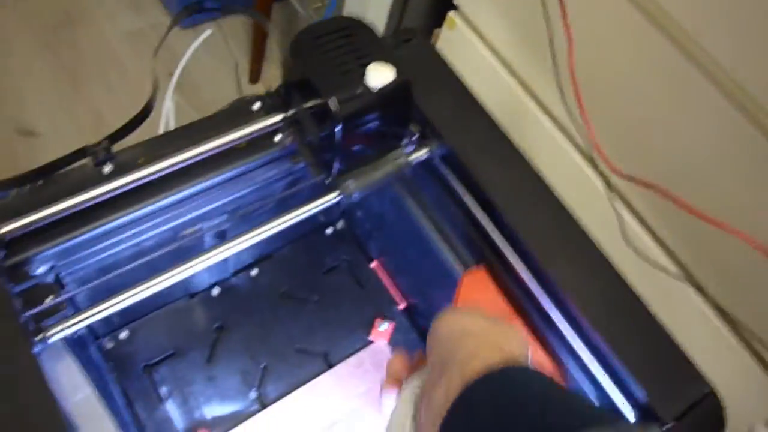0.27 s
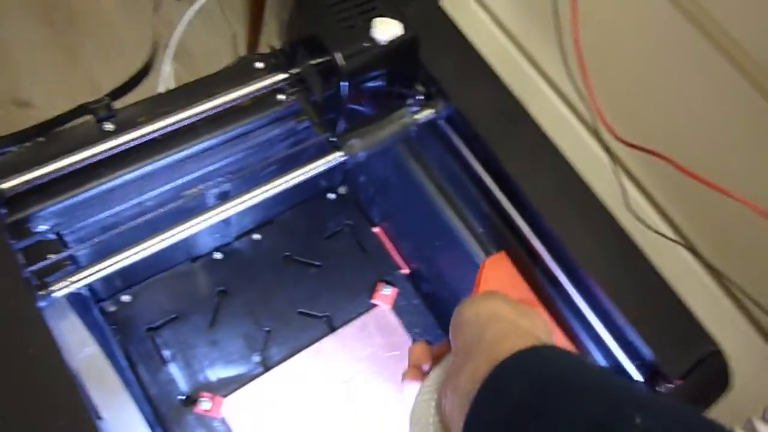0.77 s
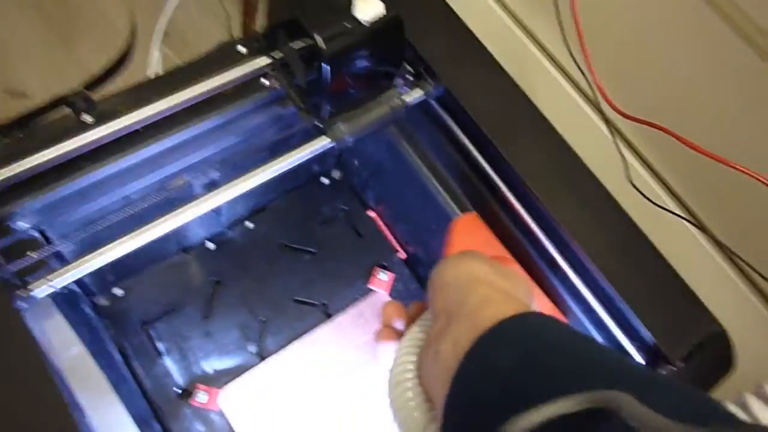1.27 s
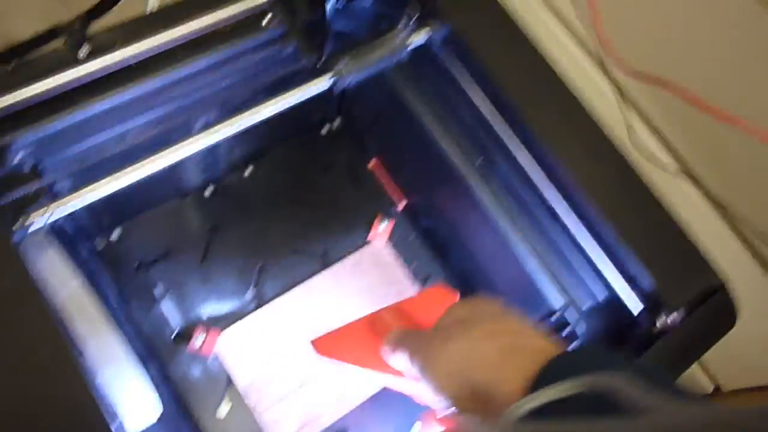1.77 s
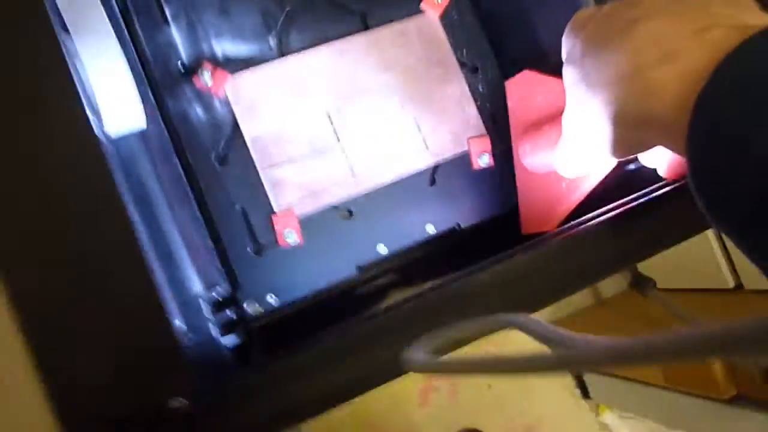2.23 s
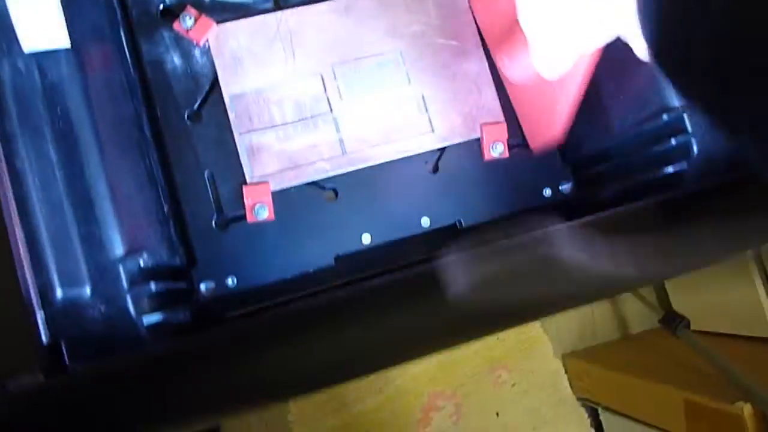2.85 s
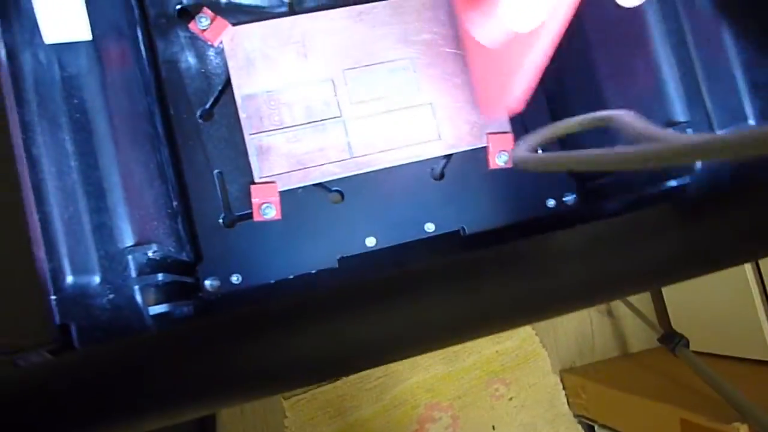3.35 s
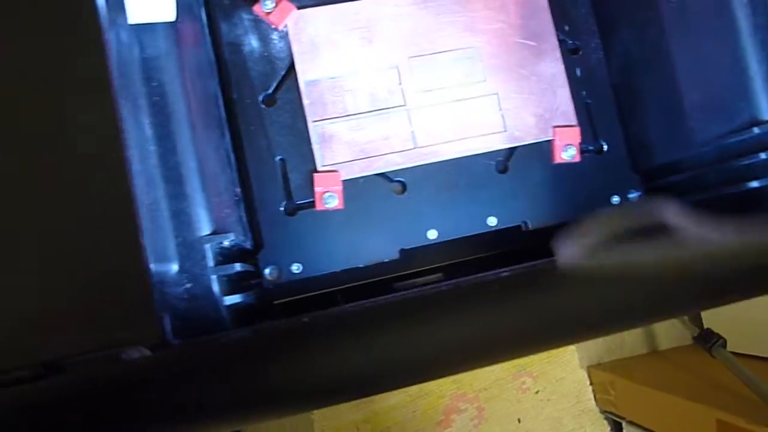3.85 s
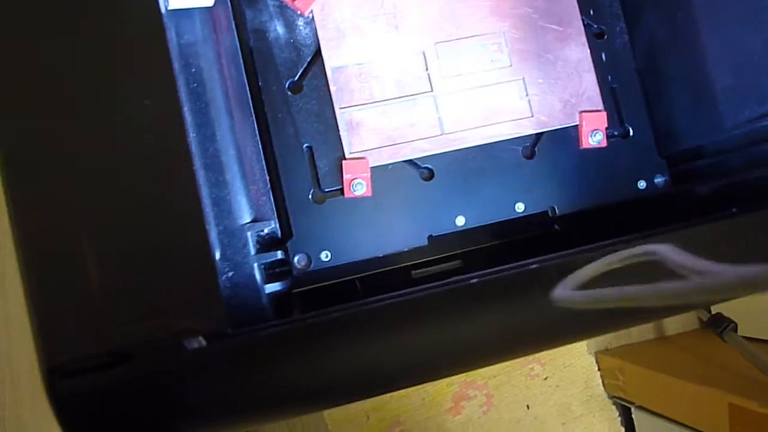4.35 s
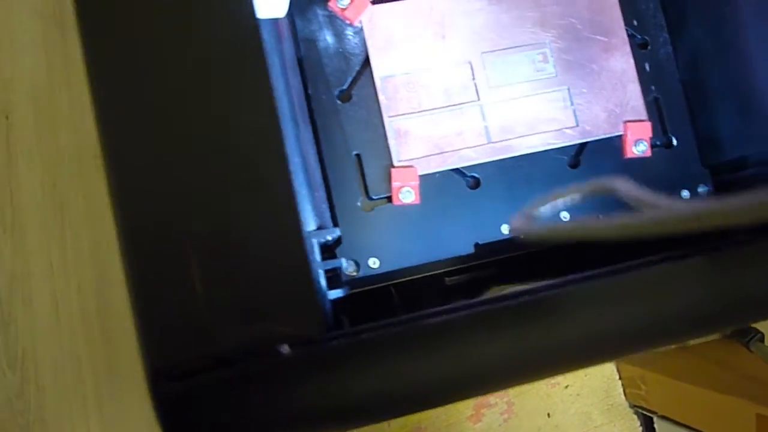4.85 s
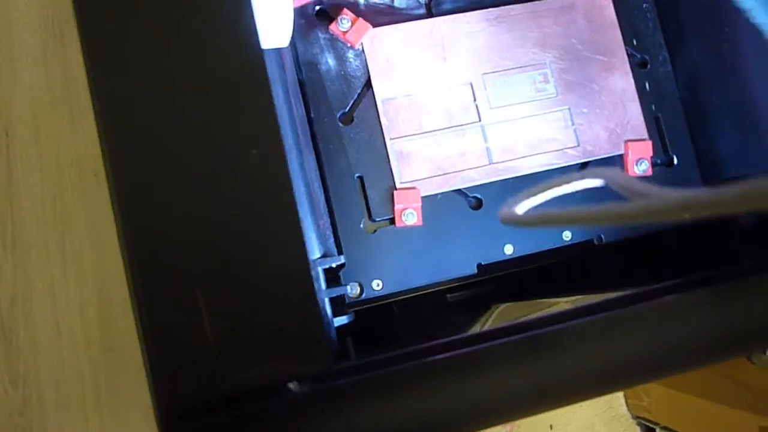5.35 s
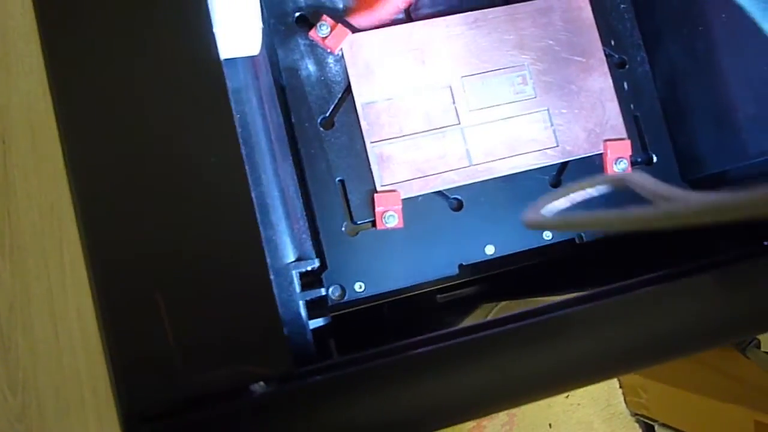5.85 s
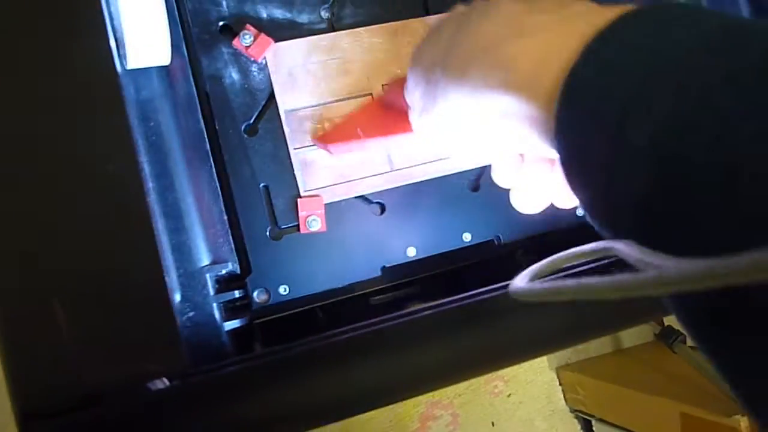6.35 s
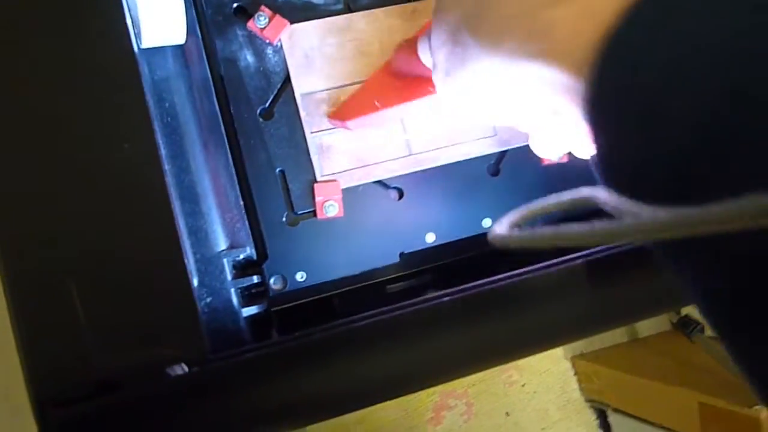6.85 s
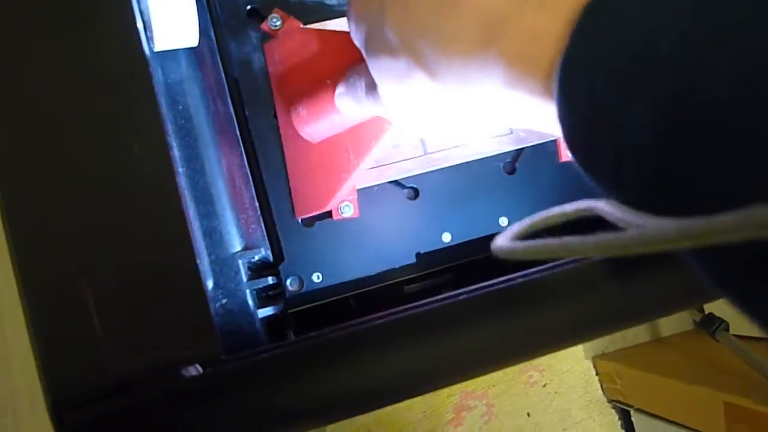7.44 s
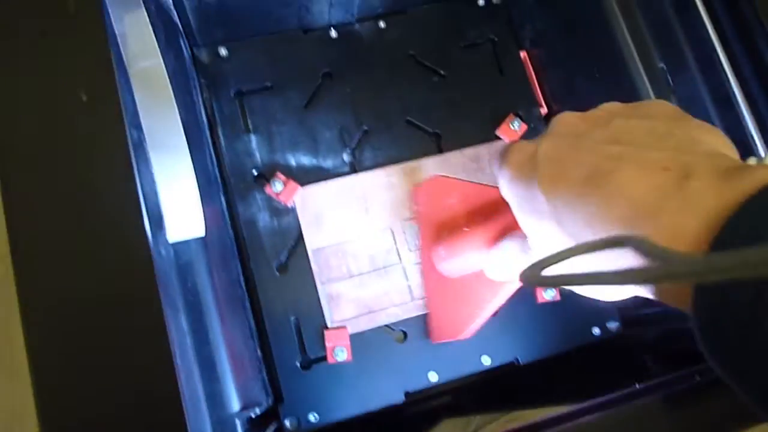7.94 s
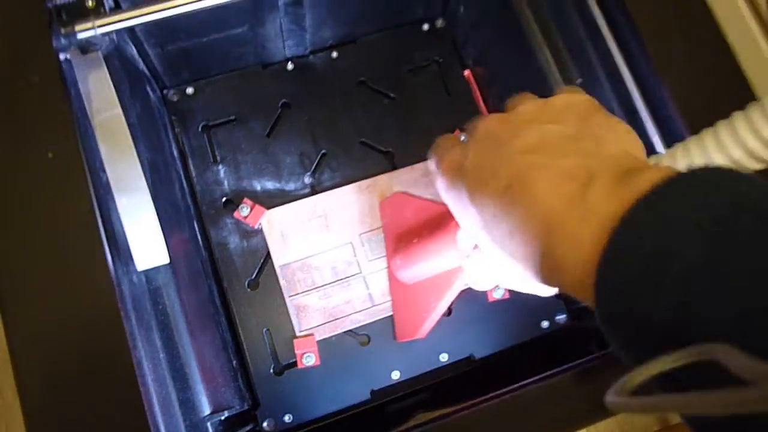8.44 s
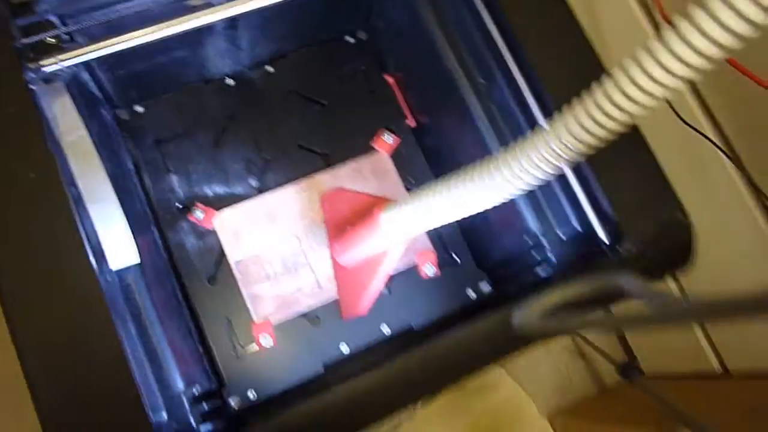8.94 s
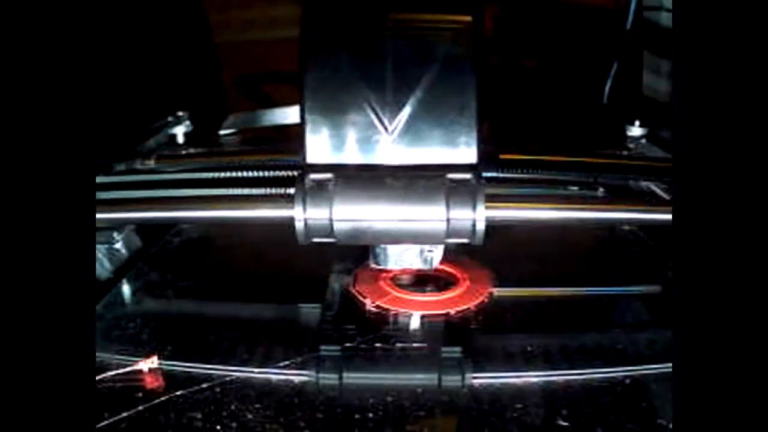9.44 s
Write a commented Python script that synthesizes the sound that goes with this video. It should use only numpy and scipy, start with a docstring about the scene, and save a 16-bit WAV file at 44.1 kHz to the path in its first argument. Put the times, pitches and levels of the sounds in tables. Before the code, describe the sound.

A vacuum cleaner hums and hisses steadily while its nozzle knocks and scrapes inside a machine, then the sound cuts off.

```python
"""A vacuum cleaner's steady hum, hiss and roar, in a workshop. Rotor unbalance gives one clean tone;
turbulence in hose and housing gives the roar; air drawn through the hand-held nozzle hisses and excites
resonances that shift as the nozzle moves. Work on a machine bed adds knocks, scrapes, ticks and bumps.
A small mono microphone with two sharp notches, gain control and a constant offset picks it all up,
until the sound is cut off after nine seconds."""
import sys
import numpy as np
from scipy import signal
from scipy.fft import rfft, irfft, next_fast_len
from scipy.io import wavfile
from scipy.ndimage import uniform_filter1d, map_coordinates

SR = 44100
rng = np.random.default_rng(int(sys.argv[2]) if len(sys.argv) > 2 else 0)


def waveform_to_disk(signal):
    """Save audio, clipped to [-1, 1], as 16-bit WAV at the path in sys.argv[1]."""
    frames = np.transpose(np.atleast_2d(signal))
    scaled = np.clip(frames, -1, 1) * 32767
    samples = np.round(scaled).astype(np.int16)
    wavfile.write(sys.argv[1], SR, samples)


N = 427325


def motor():
    """Forced vibration: the unbalanced rotor shakes the housing once a turn, radiating a pure tone."""
    # rotation rate, sagging as the motor settles: t/s, f/Hz
    shaft = [(0.05, 347.7), (0.6, 347.6), (1.25, 346.4), (1.8, 345.3), (2.7, 344.5), (3.25, 344.9),
             (4.1, 344.3), (6.9, 344.5), (8.5, 344.9)]
    # the motor's hum, swelling and dipping: t/s, level/dB
    hum = [(0.05, -28.5), (0.87, -28), (2.42, -22.5), (2.64, -23), (2.83, -25.5), (2.98, -27.5),
           (3.44, -24.5), (3.88, -26.5), (5.69, -27), (6.76, -25), (6.93, -26), (7.15, -25.5), (7.34, -25),
           (7.51, -25.5), (8.56, -24.5), (8.75, -26)]
    phase = 2 * np.pi * np.cumsum(curves(shaft)[0]) / SR
    return amp(curves(hum)[0] + .4 * wobble(7.7)) * np.sqrt(2) * np.sin(phase)


def nozzle():
    """Jet noise: the turbulent intake hisses and drives four resonances of the nozzle."""
    # lowest resonance: t/s, level/dB, f/Hz
    mouth = [(0.05, -38.5, 1040), (0.22, -41, 1091), (1.29, -40.5, 1118), (1.55, -40.5, 1060),
             (1.65, -40, 1232), (2.13, -35.5, 1174), (2.37, -39, 1060), (3.1, -37.5, 1220),
             (3.25, -37, 1047), (3.37, -37.5, 1228), (3.78, -39, 1035), (4.31, -40.5, 1067),
             (4.61, -39.5, 1180), (5.72, -37, 1184), (5.91, -41, 1143), (7.32, -40.5, 1196),
             (7.93, -39, 1228), (8.75, -39, 1144)]
    # air gap under the nozzle: t/s, level/dB
    gap = [(0.05, -44.5), (1.55, -41.5), (2.01, -47.5), (2.2, -42), (2.4, -40.5), (3.03, -37),
           (3.54, -44.5), (4.29, -43.5), (4.65, -40), (5.21, -37), (5.52, -36.5), (6.06, -41.5),
           (6.45, -40), (7.27, -43.5), (7.46, -38), (7.75, -43.5), (8.46, -45), (8.75, -41)]
    # resonance across the slot: t/s, level/dB
    slot = [(0.05, -40), (0.99, -39.5), (1.4, -40.5), (1.65, -41.5), (1.82, -35.5), (2.28, -39),
            (2.64, -32), (3.03, -37), (3.68, -36), (3.85, -40), (4.36, -36), (4.8, -39.5), (5.48, -36),
            (6.42, -40), (6.64, -38), (7.15, -39.5), (7.88, -39.5), (8.75, -40.5)]
    # air over the edge: t/s, level/dB
    edge = [(0.05, -35.5), (0.51, -35), (2.86, -33.5), (2.88, -40), (2.96, -29.5), (3.27, -39),
            (3.56, -29.5), (3.61, -35), (4.7, -34.5), (4.73, -37), (7.0, -35), (7.03, -35.5), (7.34, -33.5),
            (8.75, -37)]
    # hiss of the jet: t/s, level/dB, brightest f/Hz
    hiss = [(0.05, -27, 5760), (0.44, -25.5, 5950), (0.51, -30, 5620), (0.66, -27, 5980),
            (1.38, -25.5, 5550), (1.57, -25, 6040), (1.67, -31, 5850), (1.92, -27, 6040), (2.06, -31, 5880),
            (2.11, -25.5, 5940), (3.44, -28.5, 5540), (3.51, -25, 5800), (3.66, -29, 6070),
            (3.83, -26, 5970), (4.07, -29, 5960), (4.29, -27, 6060), (5.4, -27, 5610), (6.04, -29, 6150),
            (6.35, -26, 5520), (6.42, -25, 5960), (6.62, -29, 5680), (6.95, -26, 5860), (7.03, -29, 6020),
            (8.05, -26.5, 5800), (8.56, -27, 5830), (8.75, -27, 5880)]
    # spectrum of the hiss: f/Hz, relative level/dB
    hiss_colour = [(2500, -50), (4300, -21), (5000, -4.5), (5600, -1.5), (6200, -2.5), (6700, -4.5),
                   (7000, -12), (7300, -23.5), (7600, -38.5)]

    def hiss_shape(hz, t):
        return amp(along(hiss_colour, hz)) * (1 + peak(hz, curves(hiss, t)[1], 400))

    bands = resonance(mouth, centre_hz=curves(mouth)[1], width_hz=596, patchy_db=1.7, flutter_db=0.4)
    bands += resonance(gap, centre_hz=1698, width_hz=880, patchy_db=2.0, flutter_db=0.25)
    bands += resonance(slot, centre_hz=2415, width_hz=1130, patchy_db=0.53, flutter_db=0.0)
    bands += resonance(edge, centre_hz=3644, width_hz=1650, patchy_db=1.5, flutter_db=0.2)
    return bands + amp(curves(hiss)[0] + 0.87 * wobble(9)) * turbulence(hiss_shape, patchy_db=1.55)


def resonance(levels, centre_hz, width_hz, patchy_db, flutter_db, wander=0.025):
    """A noise-driven resonance passes one band, whose centre wanders with the unsteady hand."""
    centre = centre_hz * (1 + wander * wobble(3.097))

    def shape(hz, t):
        sample = np.minimum(t * SR, N - 1).astype(int)
        return peak(hz, centre[sample], width_hz) ** 3  # cubing narrows the band and steepens its sides

    return amp(curves(levels)[0] + flutter_db * wobble(6)) * turbulence(shape, patchy_db)


def roar():
    """Turbulent flow through hose and housing radiates broadband noise that surges unevenly."""
    # flow noise: t/s, roar level/dB, rumble level/dB
    flow = [(0.05, -44.5, -52.5), (0.39, -38.5, -59), (0.53, -41, -49), (1.55, -43.5, -49.5),
            (1.84, -42.5, -48), (2.64, -36.5, -45.5), (2.98, -40, -53), (3.35, -40.5, -49),
            (3.61, -40, -52), (4.48, -38.5, -49), (4.8, -43, -52.5), (7.39, -41.5, -49), (7.75, -41, -47.5),
            (8.75, -42, -48.5)]
    # spectrum of the roar: f/Hz, relative level/dB
    roar_colour = [(220, -36), (370, 1), (378, -12.5), (452, 0), (508, -7), (556, -7.5), (830, -7.5),
                   (1400, -17), (1820, -34), (3080, -120)]
    # spectrum of the rumble: f/Hz, relative level/dB
    rumble_colour = [(15, -27), (60, -27), (100, -8), (140, -9.5), (180, 4), (240, -1), (330, -9),
                     (400, -3.5), (500, -52.5), (800, -120)]
    roar_db, rumble_db = curves(flow)
    body = turbulence(lambda hz, t: amp(along(roar_colour, hz)), patchy_db=0.5)
    rumble = turbulence(lambda hz, t: amp(along(rumble_colour, hz)), patchy_db=0.5)
    return amp(roar_db + 1.2 * wobble(6)) * body + amp(rumble_db + 0.89 * wobble(6)) * rumble


def standing_waves(air, ripple_db, gain_db):
    """Interference of reflected waves lifts some narrow bands of the air noise and weakens others."""
    # modes of the hose and the machine's open box: f/Hz, width/Hz, gain/dB
    modes = [(448, 60, 2.5), (544, 50, 4), (738, 28, 8), (835, 32, 8), (955, 21, 10.5), (1137, 12, 4),
             (1292, 100, 5), (1408, 20, 9), (1516, 47, 6.5), (1570, 50, 1), (1647, 29, 4.5), (1757, 22, 7),
             (1940, 55, 5.5), (2078, 81, 7.5), (2210, 67, 2), (2150, 75, -4), (2268, 20, 7), (2505, 95, 2),
             (2702, 48, 7), (2770, 70, 3), (3430, 180, 1.5), (3773, 160, 2), (4076, 180, 4), (4715, 190, 5),
             (5450, 130, 2), (5810, 200, -2), (6350, 150, 4)]
    # bands that stand out or drop while the nozzle rests: start t/s, end t/s, f/Hz, width/Hz, gain/dB
    whistles = [(0, 0.48, 470, 78, 6.5), (0, 1.57, 5200, 250, 3), (0, 1.6, 990, 80, 4.5),
                (0, 1.6, 1150, 120, 5.5), (1.7, 2.05, 5900, 230, 9.5), (2.2, 3.25, 2400, 80, 4.5),
                (2.2, 4.5, 1600, 80, 4), (3.4, 3.6, 6200, 700, 4), (3.5, 4.5, 2000, 300, -4.5),
                (7, 9.1, 2340, 90, 6), (7.5, 8.7, 2770, 100, 3), (7.65, 9.1, 1290, 60, 5),
                (7.7, 8.4, 1640, 90, 5), (7.7, 9.1, 1460, 140, -8), (7.7, 9.1, 5750, 201, 4.5),
                (4.6, 5.25, 5900, 700, 3), (6.15, 7, 5570, 250, 4), (5.88, 6.15, 2740, 130, 9),
                (6.6, 6.8, 2320, 100, 8), (8.4, 9.1, 1660, 140, 12), (3.38, 3.85, 2460, 170, 9)]
    hz, t, spectrum = signal.stft(air, SR, nperseg=2048, noverlap=1536)
    db = sum(lift * peak(hz, centre, width) ** 2 for centre, width, lift in modes)[:, None]
    for start, end, centre, width, lift in whistles:
        held = np.clip(np.minimum(t - start, end - t) / 0.061 + .5, 0, 1)
        db = db + lift * peak(hz[:, None], centre, width) ** 2 * held
    # room echoes leave a fine ripple that drifts as hand and microphone move
    ripple = ripple_db * patches(spectrum.shape, bins=2, frames=32)
    return signal.istft(spectrum * amp(db + ripple + gain_db), SR, nperseg=2048, noverlap=1536)[1][:N]


def knocks():
    """Impact on hollow plastic: a click and two heavily damped partials."""
    # the nozzle taps the bed: t/s, level/dB, f/Hz
    impacts = [(2.775, -24, 1320), (2.821, -16.5, 1860), (4.247, -21, 1000), (4.27, -12, 1060),
               (4.417, -20, 992), (4.787, -22, 1190), (5.264, -18.5, 1130), (5.876, -21, 1020),
               (6.258, -22.5, 1610), (6.439, -22, 835), (6.488, -22.5, 760), (6.852, -24, 1230),
               (7.284, -26, 1350)]
    out, t = np.zeros(N), np.arange(SR // 10) / SR
    envelope = t / .0018 * np.exp(1 - t / .0018)  # a few cycles only
    for start, db, hz in impacts:
        ring = np.sin(2 * np.pi * hz * t) + 0.2 * np.sin(2 * np.pi * 1.6 * hz * t)
        click = 0.35 * amp(-60 * t / .006) * rng.standard_normal(len(t))
        out[round(start * SR):][:len(t)] += amp(db) * (0.73 * ring * envelope + click)
    return out


def scrapes_and_ticks(grain_db=3):
    """Random modulation spreads a gliding pitch into a rough noise band; the briefest bursts tick."""
    # short rough scrapes and two high ticks: t/s, duration/s, start f/Hz, end f/Hz, width/Hz, level/dB
    bursts = [(2.813, 0.049, 1950, 1650, 300, -25.5), (2.854, 0.028, 1610, 1200, 200, -23.5),
              (2.914, 0.065, 1900, 1500, 807, -27), (2.965, 0.073, 1910, 2510, 705, -29.5),
              (3.035, 0.074, 1406, 1246, 300, -31.5), (3.095, 0.11, 2010, 1700, 590, -28.5),
              (5.434, 0.074, 2044, 2094, 100, -36), (6.21, 0.034, 1630, 1570, 152, -34),
              (6.356, 0.065, 1750, 1693, 148.5, -33), (6.95, 0.077, 1253, 1350, 1393, -24),
              (6.934, 0.08, 5240, 5160, 2505, -26), (7.493, 0.074, 1193, 1310, 900, -30),
              (1.589, 0.071, 1910, 1880, 590, -35), (7.367, .04, 1194, 1210, 910, -35),
              (7.59, 0.054, 3600, 3400, 909, -31), (0.713, .04, 1100, 1100, 500, -30),
              (0.895, 0.037, 1103, 1100, 500, -33), (6.251, 0.048, 900, 904, 500, -33.5),
              (7.58, 0.048, 798, 750, 300, -33.5), (7.53, 0.0085, 5900, 5900, 1200, -21.5),
              (7.629, 0.017, 5750, 5700, 900, -23)]
    out = np.zeros(N)
    for start, duration, start_hz, end_hz, width_hz, db in bursts:
        progress = np.linspace(0, 1, round(duration * SR))
        knots = np.arange(len(progress)) * width_hz / SR
        in_phase, quadrature = (map_coordinates(row, [knots]) for row in rng.standard_normal((2, 200)))
        phase = 2 * np.pi * np.cumsum(start_hz + (end_hz - start_hz) * progress) / SR
        band = unit(in_phase * np.cos(phase) + quadrature * np.sin(phase))
        out[round(start * SR):][:len(band)] += amp(db) * np.sin(np.pi * progress) ** 0.59 * band
    return out * amp(grain_db * wobble(120))


def bumps():
    """Free vibration: each soft blow thuds and leaves the frame's low modes ringing in a new balance."""
    # hose and hand bump the frame: t/s, level/dB
    blows = [(2.777, -36.5), (2.825, -33.5), (3.475, -43.5), (4.232, -36), (4.421, -38), (4.558, -36.5),
             (4.81, -37.5), (5.16, -33), (5.396, -35.5), (5.926, -36), (6.871, -34.5), (7.391, -35),
             (7.529, -31.5), (8, -46)]
    # modes of the frame: f/Hz, relative level/dB, T60/s
    modes = [(185, -8.5, 0.34), (271.3, -2, 0.44), (434, 2, 0.14)]
    out, t = np.zeros(N), np.arange(SR // 2) / SR
    dull = signal.butter(2, [130, 520], "bandpass", fs=SR, output="sos")
    attack = 1 - np.exp(-t / 0.0036)
    for start, db in blows:
        ring = sum(amp(level + rng.normal(0, 2.0) - 60 * t / t60) * np.sin(2 * np.pi * hz * t)
                   for hz, level, t60 in modes)
        thud = .6 * amp(-60 * t / 0.2) * unit(signal.sosfilt(dull, rng.standard_normal(len(t))))
        out[round(start * SR):][:len(t)] += amp(db) * (ring + thud) * attack
    return out


def gain_control(x, threshold_db=-24, share_removed=0.7, sense_s=0.023, recover_db_per_s=22):
    """Compression: loud moments pull the gain down quickly; it climbs back at a steady rate."""
    sensed = signal.lfilter(*signal.butter(1, 505, "highpass", fs=SR), x[0])  # bass counts for less
    power = np.abs(uniform_filter1d(sensed ** 2, round(sense_s * SR)))
    level_db = 10 * np.log10(power + 1e-12)
    climb_db = recover_db_per_s * np.arange(N) / SR
    held_db = np.maximum.accumulate(level_db + climb_db) - climb_db
    excess_db = uniform_filter1d(np.maximum(held_db - threshold_db, 0), size=200)
    return x * amp(-share_removed * excess_db)


def turbulence(shape, patchy_db):
    """Random pressure of rms 1: shape(hz, t) colours it, patches of random gain make it uneven."""
    hz, t, spectrum = signal.stft(rng.standard_normal(N), SR, nperseg=1024)
    uneven = amp(patchy_db * patches(spectrum.shape, bins=5, frames=6))
    gain = shape(hz[:, None], t) * np.ones(spectrum.shape)
    gain = gain / np.sqrt(np.mean(gain ** 2, axis=0))  # equal power in every frame
    return unit(signal.istft(spectrum * gain * uneven, SR, nperseg=1024)[1][:N])


def patches(shape, bins, frames):
    """A random field of rms 1, smoothed over frequency and time."""
    field = uniform_filter1d(rng.standard_normal(shape), size=bins, axis=0)
    return unit(uniform_filter1d(field, size=frames, axis=1))


def wobble(rate):
    """A smooth random curve with rate knots a second."""
    return map_coordinates(rng.standard_normal(int(N * rate / SR) + 4), [np.arange(N) * rate / SR])


def peak(hz, centre_hz, width_hz):
    """Amplitude response of a resonator with the given half-power width."""
    return 1 / np.sqrt(1 + (2 * (hz - centre_hz) / width_hz) ** 2)


def curves(rows, t=None):
    """Each column after the time, interpolated at every sample or at the times t."""
    times, *columns = np.transpose(rows)
    return [np.interp(np.arange(N) / SR if t is None else t, times, column) for column in columns]


def along(points, hz):
    """Level of a spectrum, interpolated on a logarithmic frequency axis."""
    frequencies, levels = np.transpose(points)
    return np.interp(np.log(hz + 1), np.log(frequencies + 1), levels)


def amp(db):
    """Amplitude ratio of a level in dB."""
    return 10 ** (np.asarray(db) / 20)


def unit(x):
    """The signal scaled to rms 1."""
    return x / np.sqrt(np.mean(x ** 2) + 1e-20)


def scene():
    """Superposition: the pressures of all sources add at one microphone."""
    air = standing_waves(roar() + nozzle(), ripple_db=2.54, gain_db=-1.18)
    return np.tile(motor() + air + knocks() + scrapes_and_ticks() + bumps(), (2, 1))


def record(dry):
    """Transduction: two notches, gain control, the converter's offset, a cut to silence, a band limit."""
    # notches in the microphone's response: f/Hz, width/Hz
    notches = [(2995, 242), (4397, 278)]
    offset, cut_s, top_hz = -.0552, 9.0046, 7575
    size = next_fast_len(N + SR // 2)
    hz = np.fft.rfftfreq(size, 1 / SR)
    response = np.prod([(centre ** 2 - hz ** 2) / (centre ** 2 - hz ** 2 + 1j * hz * width)
                        for centre, width in notches], axis=0)
    notched = irfft(rfft(dry, size) * response, size)[:, :N]
    gated = (gain_control(notched) + offset) * (np.arange(N) < cut_s * SR)
    lowpass = signal.firwin(601, top_hz, window=("kaiser", 9), fs=SR)
    padded = np.pad(gated, ((0, 0), (300, 300)), "reflect")
    return signal.fftconvolve(padded, lowpass[None], "valid", axes=1)


dry = scene()
out = record(dry)
waveform_to_disk(out)
```